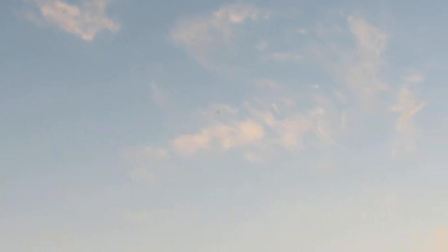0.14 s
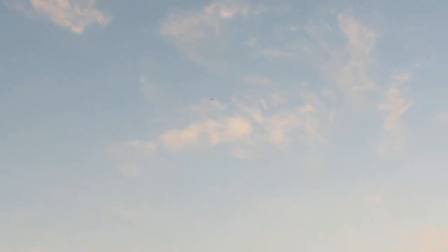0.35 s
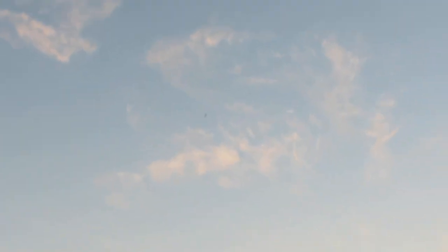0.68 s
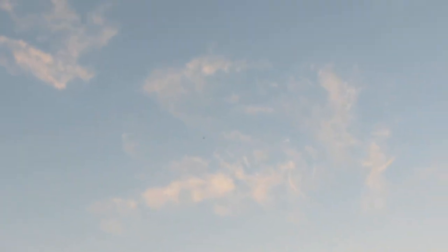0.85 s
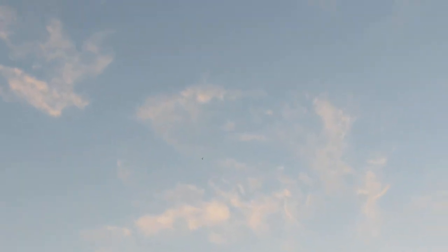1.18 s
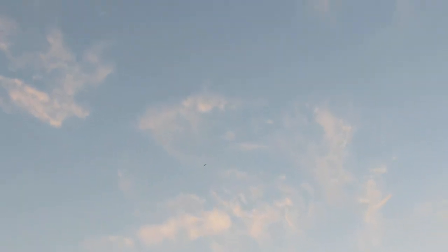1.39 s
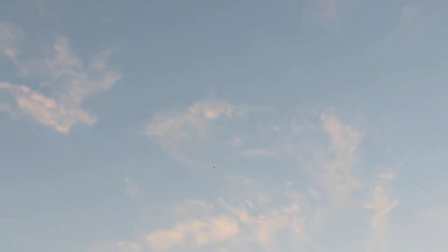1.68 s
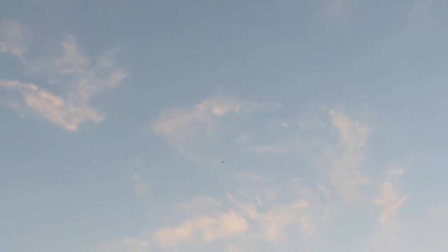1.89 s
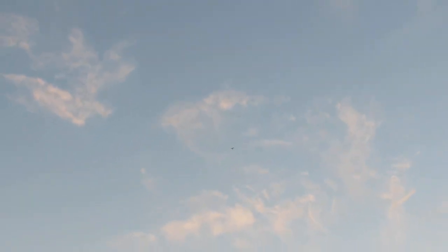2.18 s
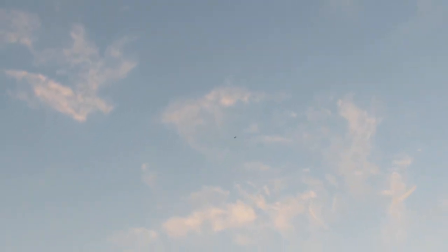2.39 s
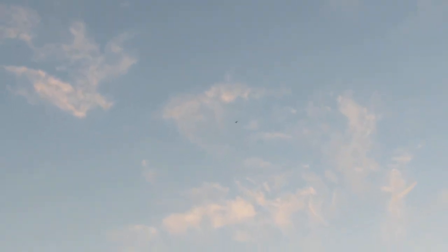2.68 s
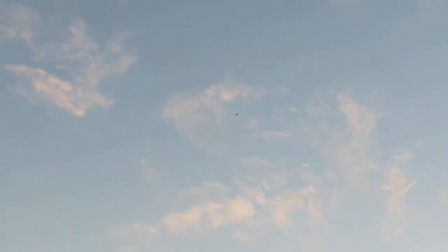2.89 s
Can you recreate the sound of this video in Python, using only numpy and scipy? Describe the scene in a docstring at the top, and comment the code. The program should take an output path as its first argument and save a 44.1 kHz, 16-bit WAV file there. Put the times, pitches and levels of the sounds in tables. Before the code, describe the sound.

Two short raspy bird buzzes from open sky, with heavy low wind buffeting between them.

```python
"""Outdoors under an open sky, a nighthawk gives two nasal, buzzy calls high overhead, faintly echoed.
Each call is one whistle swept and pulsed about 230 times a second; it dips, then clears as it rises.
Gusts, as bands of noise with single thumps, buffet the microphone over an even outdoor hiss.
The hardest gusts overload it, and the gain control ducks the whole sound."""
import sys
import numpy as np
from scipy import signal
from scipy.fft import rfft, irfft
from scipy.io import wavfile

SR = 44100
rng = np.random.default_rng(int(sys.argv[2]) if len(sys.argv) > 2 else 0)


def put_to_file(sound):
    """Save the sound as 16-bit audio at rate SR, in the file named by the first command-line argument."""
    columns = np.atleast_2d(sound).T  # one column per channel
    safe = np.clip(columns, -1, 1)
    whole_steps = np.round(safe * 32767)
    wavfile.write(sys.argv[1], SR, whole_steps.astype(np.int16))


N = 134505


def amp(db):
    """Decibel law: twenty decibels are a factor of ten in amplitude."""
    return 10 ** (np.asarray(db) / 20)


def unit(x):
    """Normalisation to a root-mean-square of one."""
    return x / np.sqrt(np.mean(x ** 2) + 1e-20)


def add(mix, start_s, sound):
    """Superposition: sound pressures add from the start time onward."""
    part = mix[max(round(start_s * SR), 0):][:len(sound)]
    part += sound[:len(part)]


def colour(x, points):
    """Linear filtering: the spectrum is weighted by (Hz, dB) points joined along log frequency."""
    point_hz, point_db = np.transpose(points)
    hz = np.fft.rfftfreq(N, 1 / SR)
    gain_db = np.interp(np.log(hz + 1), np.log(point_hz), point_db)
    return irfft(rfft(x) * amp(gain_db), N)


def wander(rate_hz):
    """Low-passed chance: noise of unit size whose spectrum fades smoothly around the given rate."""
    lowpass = np.exp(-(np.fft.rfftfreq(N, 1 / SR) / rate_hz) ** 2)
    return unit(irfft(rfft(rng.standard_normal(N)) * lowpass, N))


# Spectrum of the outdoor hiss, relative levels: frequency_hz [Hz], level_db [dB]
HISS_SPECTRUM = [(20, -40.5), (60, -26), (120, -36.5), (250, -52), (600, -50), (2200, -62), (4500, -67.5),
                 (8000, -71), (15500, -77.5)]
HISS_DB, HISS_SHARED = -42, 0.12  # level; share of the power common to both channels


def hiss():
    """Partial coherence: distant outdoor noise reaches the two channels nearly independently."""
    left, right, both = (unit(colour(rng.standard_normal(N), HISS_SPECTRUM)) for _ in range(3))
    separate = np.sqrt(1 - HISS_SHARED) * np.array([left, right])
    return amp(HISS_DB) * (separate + np.sqrt(HISS_SHARED) * both)


# Course of the gusts, before the band levels: time_s [s], rumble_db [dB], low_mids_db [dB]
GUSTS = [(0.0, -71, -75), (0.23, -90, -60.5), (0.35, -50, -80), (0.37, -39, -49.5), (0.51, -35.5, -103),
         (0.53, -41, -58.5), (0.61, -46, -86), (0.72, -32.5, -61), (0.74, -39.5, -54), (0.83, -25.5, -46.5),
         (0.86, -25.5, -33.5), (1.05, -27, -40.5), (1.08, -25, -54), (1.13, -32.5, -42.5),
         (1.15, -22.5, -24.5), (1.27, -28.5, -27.5), (1.32, -23.5, -44.5), (1.35, -26.5, -25.5),
         (1.44, -25.5, -30.5), (1.49, -26, -48.5), (1.52, -44, -78), (1.67, -29.5, -59), (1.69, -36, -69),
         (1.76, -23, -44.5), (1.78, -31.5, -65), (1.93, -25.5, -36.5), (2.02, -22.5, -45.5),
         (2.08, -44.5, -71), (2.39, -34, -57), (2.44, -41, -78), (2.57, -38, -79), (2.61, -25, -44),
         (2.63, -40.5, -66), (2.67, -23, -41.5), (2.7, -35, -65.5), (2.78, -17.5, -29),
         (2.85, -27.5, -35.5), (2.92, -21.5, -47), (2.96, -45.5, -69), (3.05, -47.5, -85)]
# Noise bands of the wind: centre_hz [Hz], level_db [dB],
# mids_share [share that follows the low mids], flutter_db [dB]
GUST_BANDS = [(34.7, 1, 0, 0), (61, 12.5, 0, 0.5), (106.3, 14.5, 0.025, 3.5), (182.5, 17.5, 0.48, 2.5),
              (297.2, 13.5, 0.84, 2), (559, 0, 1.05, 1.5), (880, -19, 1.94, 10)]
# Hardest buffets, as pushed on the left port: time_s [s], peak_db [dB], width_s [s]
THUMPS = [(0.833, 3.5, .0023), (.888, 4, 0.0012), (.95, 4, .0014), (1.047, 2, 0.0011), (1.149, 8.5, 0.002),
          (1.19, 10, 0.00081), (1.238, 8, 0.00073), (1.346, -0.5, 0.00056), (1.388, 5.5, 0.00076),
          (1.421, -3, 0.00055), (1.86, -4.5, 0.0011), (1.977, -0.5, 0.0012), (2.786, 6.5, 0.0026)]
BAND_WIDTH_OCTAVES, FLUTTER_HZ = 0.36, 94.6
RIGHT_PORT_GAIN = -0.5  # the two ports are pushed in opposite directions


def wind():
    """Turbulent pressure: eddies at the ports make fluttering noise bands; the hardest land as thumps."""
    t, hz = np.arange(N) / SR, np.fft.rfftfreq(N, 1 / SR)
    time_s, rumble_db, mids_db = np.transpose(GUSTS)
    rumble_db = np.interp(t, time_s, rumble_db)
    mids_db = np.interp(t, time_s, mids_db)
    flutter = wander(FLUTTER_HZ)
    pressure = np.zeros(N)
    for centre_hz, level_db, mids_share, flutter_db in GUST_BANDS:
        octaves = np.log2((hz + 1) / centre_hz)
        band = np.exp(-.5 * (octaves / BAND_WIDTH_OCTAVES) ** 2)
        eddies = unit(irfft(rfft(rng.standard_normal(N)) * band, N))
        gust_db = rumble_db + mids_share * (mids_db - rumble_db)
        pressure += eddies * amp(level_db + gust_db + flutter_db * flutter)
    for time_s, peak_db, width_s in THUMPS:
        u = (t - time_s) / width_s
        push = np.exp(-u ** 2 / 2)
        thump = amp(peak_db) * (1 - u ** 2) * push
        pressure = pressure * (1 - push) + thump  # the thump displaces the eddies
    return np.array([pressure, RIGHT_PORT_GAIN * pressure])


# Colour of the echoes, dulled by the long way round: frequency_hz [Hz], level_db [dB]
ECHO_SPECTRUM = [(2000, -11), (3400, 2), (4100, -10), (5000, -4), (8000, -32)]
ECHO_DB, ECHO_T60_S, ECHO_RISE_S = -10.5, 0.45, 0.019


def echoes(x):
    """Diffuse reverberation: convolution with decaying noise gives a dull, scattered tail."""
    t = np.arange(SR) / SR
    envelope = amp(-60 * t / ECHO_T60_S) * np.minimum(t / ECHO_RISE_S, 1)
    taps = rng.standard_normal((2, SR)) * envelope
    taps = taps / np.linalg.norm(taps[0])
    dull = colour(x, ECHO_SPECTRUM)
    return amp(ECHO_DB) * signal.fftconvolve(dull[None], taps, axes=1)[:, :N]


# Course of every call, before the factors of the single call: time_s [s from its start],
# top_pitch_hz [Hz], downward_sweep_hz [Hz], level_db [dB], pulsing_depth_db [dB], buzz_rate [factor]
CALL_COURSE = [(0, 2400, 700, -32.5, 17, 0.79), (0.011, 3250, 1100, -18.5, 10, 1.02),
               (.019, 4620, 1750, -6, 23, 1.02), (.045, 4720, 1600, -2, 22, 1.0),
               (.195, 4803, 1540, -7.5, 24.5, .985), (.224, 4176, 1049, -4.5, 27.5, 0.92),
               (.252, 3950, 850, -5, 19, 1.05), (.274, 4050, 600, -7, 5.5, 1.16),
               (.294, 4240, 100, -7.5, 0, 1.0), (0.304, 4130, 59.5, -11, -11, 0.52)]
# Second and third harmonic: level_db [dB], depth_share [share of the pulsing depth]
HARMONICS = [(-18.5, 0.34), (-30.5, -0.16)]
SWEEP_SHAPE, PULSE_SHAPE = 1.35, 1.68  # higher is a narrower dip
SWEEP_LEAD = 0.092  # cycles by which the pitch peaks before the loudness
RELEASE_S = 0.0024
RATE_JITTER, PITCH_JITTER = 0.012, .018  # shares
PITCH_WOBBLE = .009  # share; the pitch wobbles with the buzz rate
SHIMMER_DB, RASP_DB = 1.7, -26.5


def peent(level_db, pitch, buzz_hz, bright_db):
    """Frequency and amplitude modulation: pitch and loudness plunge once in every cycle of the buzz."""
    course = np.transpose(CALL_COURSE)
    t = np.arange(0, course[0, -1], 1 / SR)
    top_hz, sweep_hz, course_db, depth_db, rate = (np.interp(t, course[0], c) for c in course[1:])
    slip, waver, shimmer, rasp = (wander(hz)[:len(t)] for hz in (112, 1200, 170, 3060))
    rough = depth_db / depth_db.max()  # the voice clears as the pulsing stops

    cycle = np.cumsum(buzz_hz * rate * (1 + RATE_JITTER * slip)) / SR
    pitch_dip = abs(np.sin(np.pi * (cycle + SWEEP_LEAD))) ** (2 * SWEEP_SHAPE)
    shut = abs(np.sin(np.pi * cycle)) ** (2 * PULSE_SHAPE)

    unsteady = 1 + rough * (PITCH_JITTER * waver + PITCH_WOBBLE * slip)
    pitch_hz = pitch * (top_hz - sweep_hz * pitch_dip) * unsteady
    phase = 2 * np.pi * np.cumsum(pitch_hz) / SR
    voice = amp(-depth_db * shut) * np.sin(phase)
    for k, (harmonic_db, depth_share) in enumerate(HARMONICS):
        pulsed = amp(bright_db + harmonic_db - depth_share * depth_db * shut)
        voice = voice + rough ** k * pulsed * np.sin((k + 2) * phase)  # the third follows the roughness

    release = np.minimum((t[-1] - t) / RELEASE_S, 1)
    loudness = amp(level_db + course_db + SHIMMER_DB * shimmer)
    return release * voice * loudness * (1 + amp(RASP_DB) * rough * rasp)


# The calls: start_s [s], level_db [dB], pitch [factor], buzz_hz [Hz, before the course], overtones_db [dB]
CALLS = [(.296, -20.5, 0.96, 231.2, 0.5), (2.463, -16, 0.96, 227.3, -0.5)]
# Colour given by the distance: frequency_hz [Hz], level_db [dB]
DISTANCE_SPECTRUM = [(1500, 9.5), (2500, 4.5), (3400, -4), (4400, 4), (5500, -2.5), (7000, -3),
                     (9000, -8.5), (10000, 7.5), (11200, -5.5), (13000, -14), (16000, -28)]
# Left channel relative to the right, by the side of arrival: frequency_hz [Hz], level_db [dB]
SIDE_SPECTRUM = [(2000, -13), (3200, 2), (3900, -7), (4600, -7), (5500, 11.5), (6500, 3.5), (7700, 4.5),
                 (9000, 8.5), (9900, -13), (11500, 2)]


def nighthawk():
    """Propagation filtering: distance and side of arrival colour the calls, and echoes follow."""
    calls = np.zeros(N)
    for start_s, *call in CALLS:
        add(calls, start_s, peent(*call))
    calls = colour(calls, DISTANCE_SPECTRUM)
    direct = np.array([colour(calls, SIDE_SPECTRUM), calls])
    return direct + echoes(calls)


def scene():
    """Superposition of the hiss, the wind and the bird."""
    return hiss() + wind() + nighthawk()


LIMIT_DB, RECOVER_DB_PER_S, DUCK_S = -0.5, 5.5, 0.0005
EDGE_HZ = 15850


def record(dry):
    """Peak limiting: gain falls quickly and recovers slowly; the rest clips; then the band limit."""
    level_db = 20 * np.log10(abs(dry).max(0) + 1e-9)  # the louder channel rules both
    over_db = np.maximum(level_db - LIMIT_DB, 0)
    recovered_db = np.arange(N) * RECOVER_DB_PER_S / SR
    held_db = np.maximum.accumulate(over_db + recovered_db) - recovered_db
    r = np.exp(-1 / (DUCK_S * SR))
    duck_db = signal.lfilter([1 - r], [1, -r], held_db)
    clipped = np.clip(dry * amp(-duck_db), -1, 1)
    lowpass = signal.firwin(511, EDGE_HZ, window=("kaiser", 9), fs=SR)
    return signal.oaconvolve(clipped, lowpass[None], "same")


dry = scene()
out = record(dry)
put_to_file(out)
```